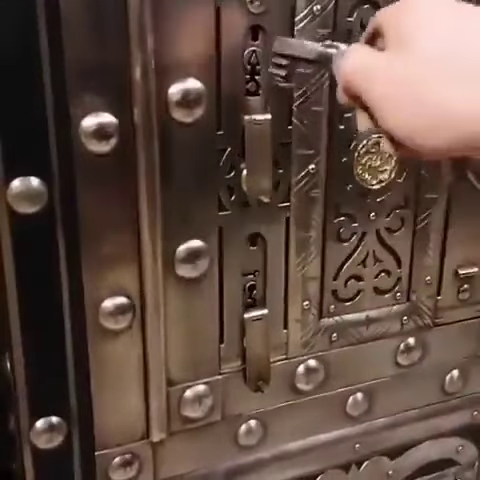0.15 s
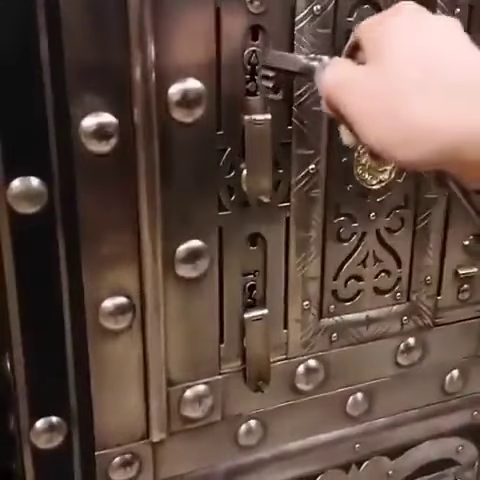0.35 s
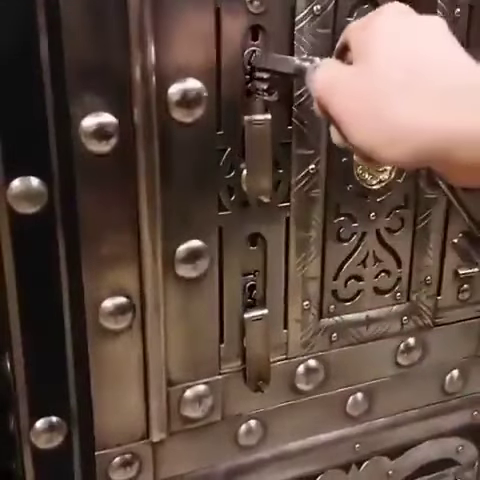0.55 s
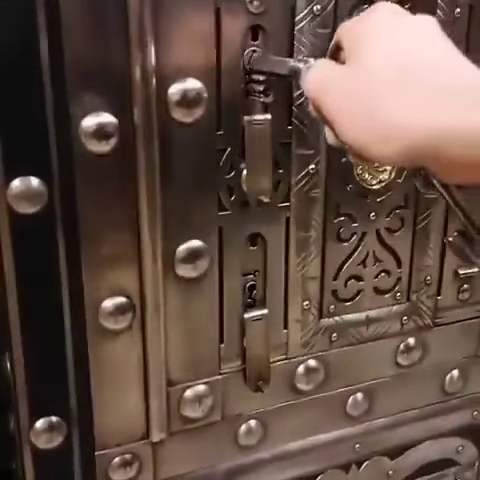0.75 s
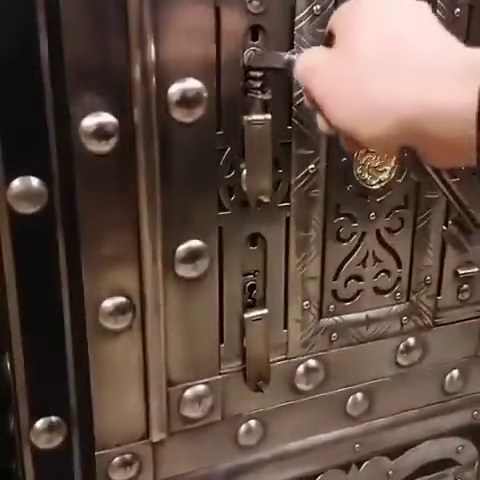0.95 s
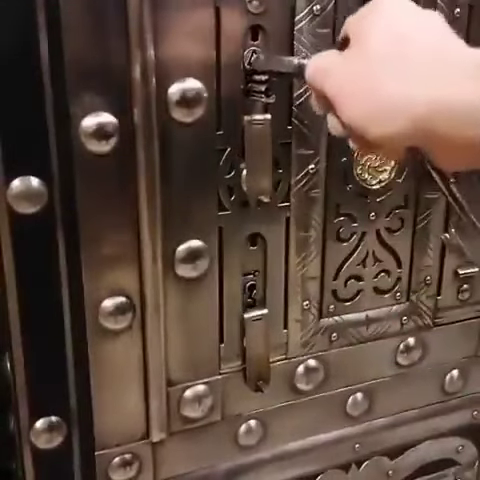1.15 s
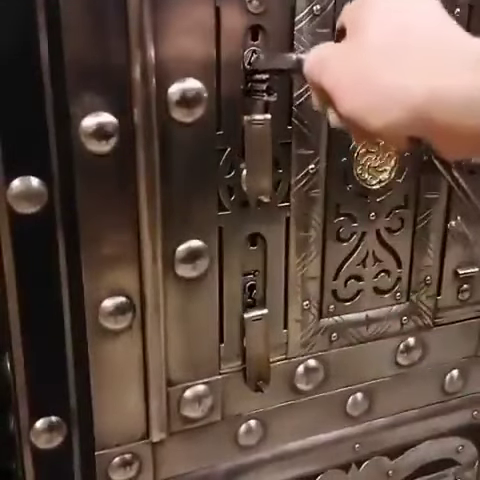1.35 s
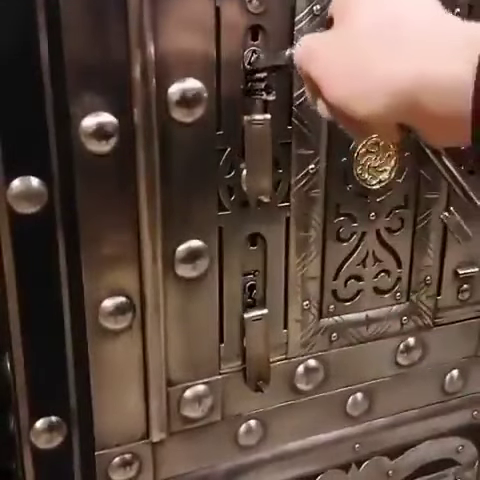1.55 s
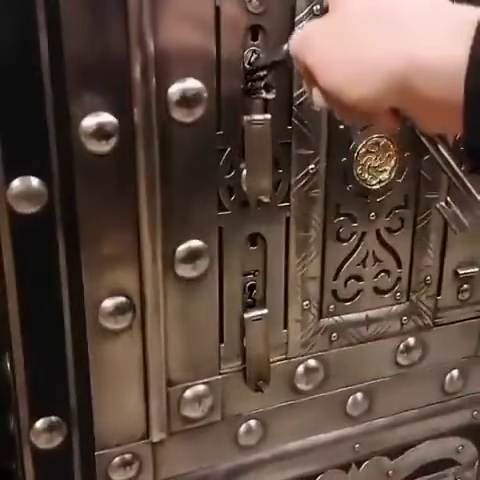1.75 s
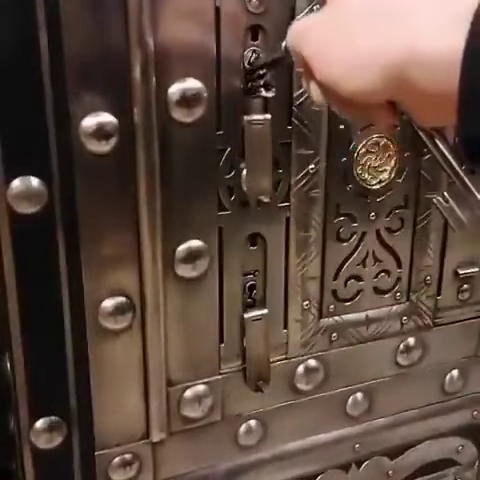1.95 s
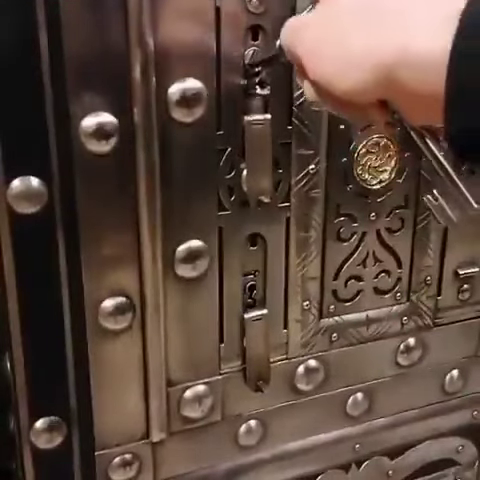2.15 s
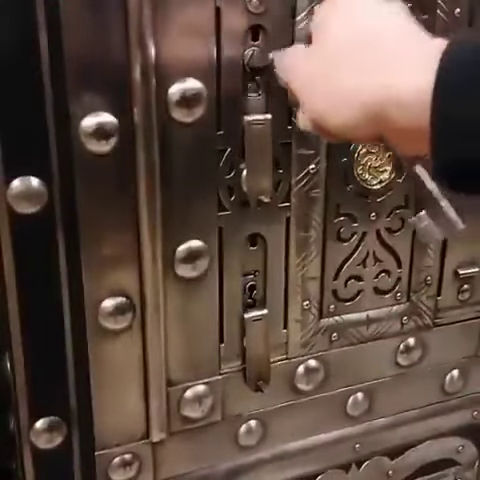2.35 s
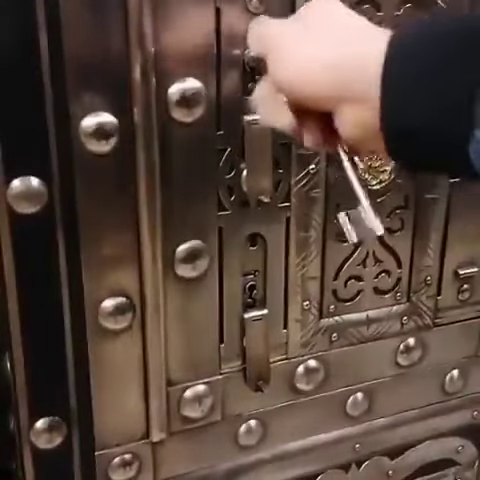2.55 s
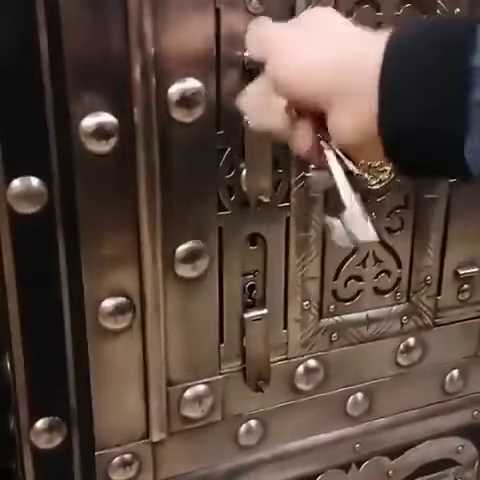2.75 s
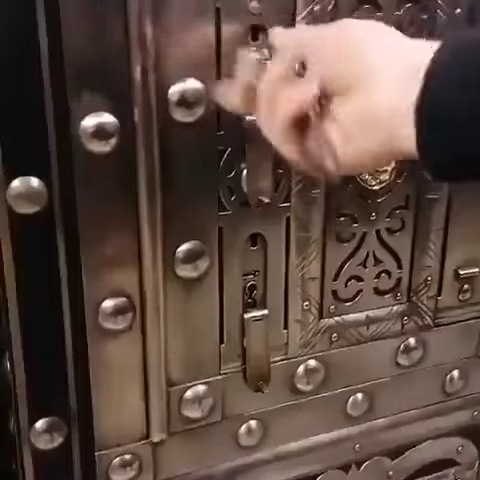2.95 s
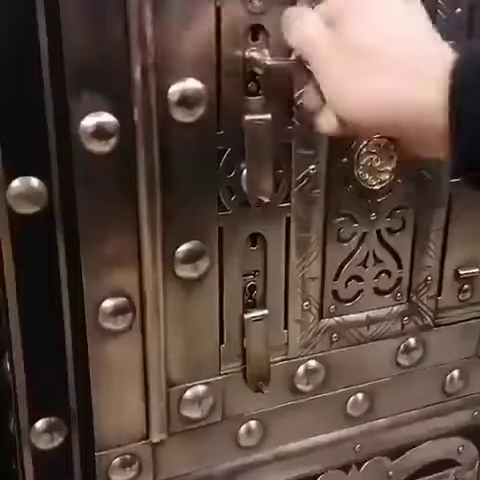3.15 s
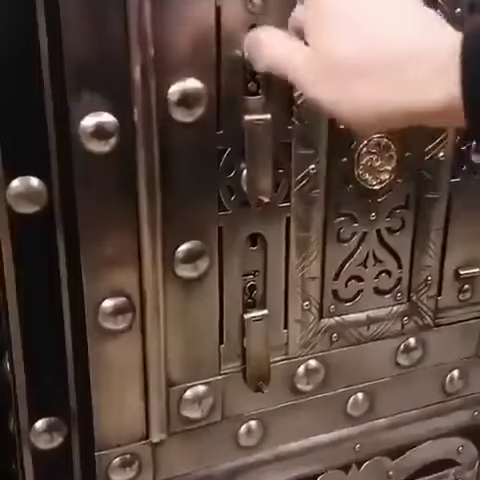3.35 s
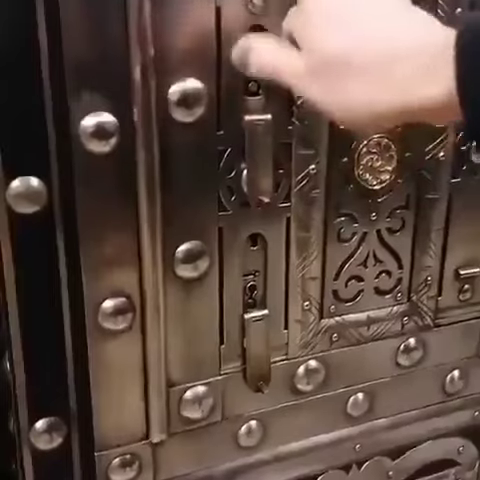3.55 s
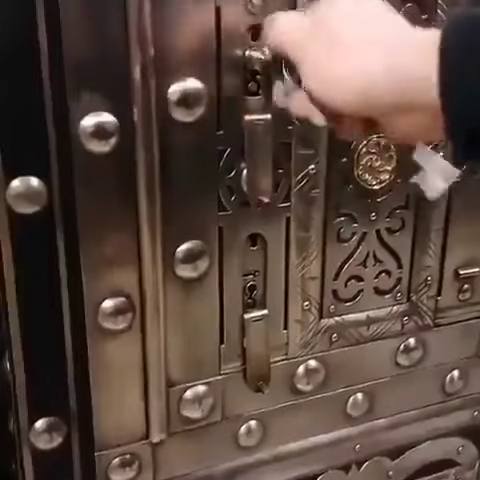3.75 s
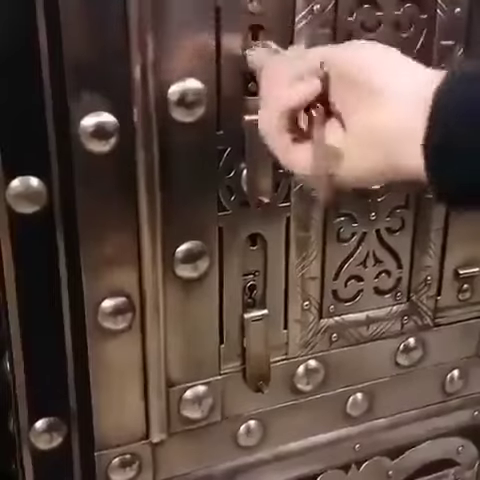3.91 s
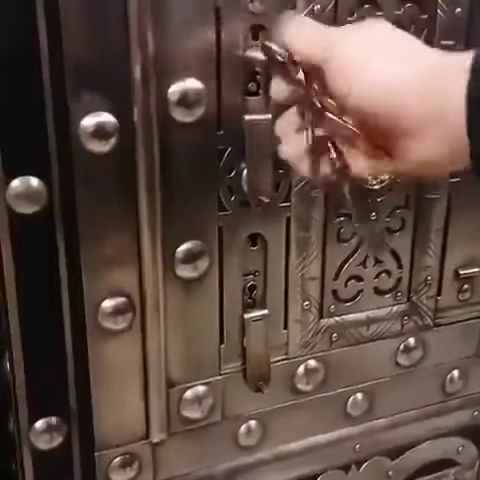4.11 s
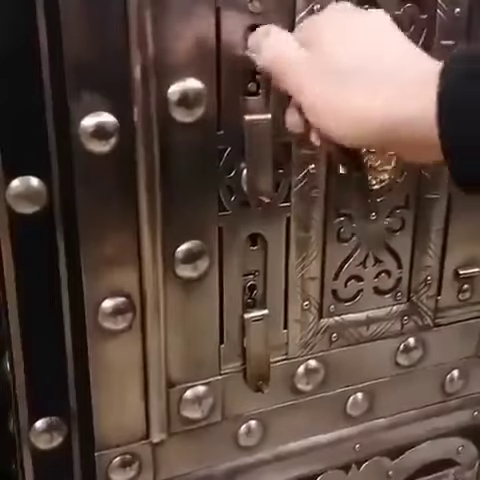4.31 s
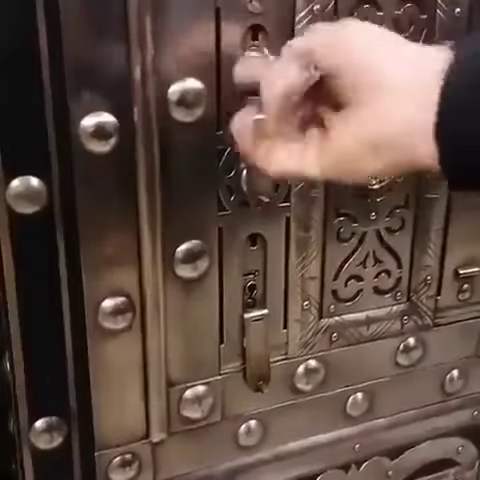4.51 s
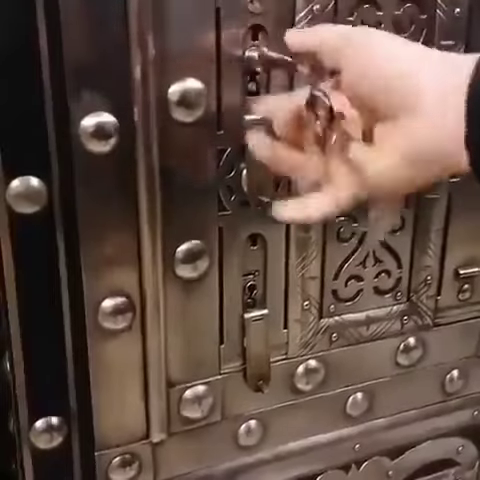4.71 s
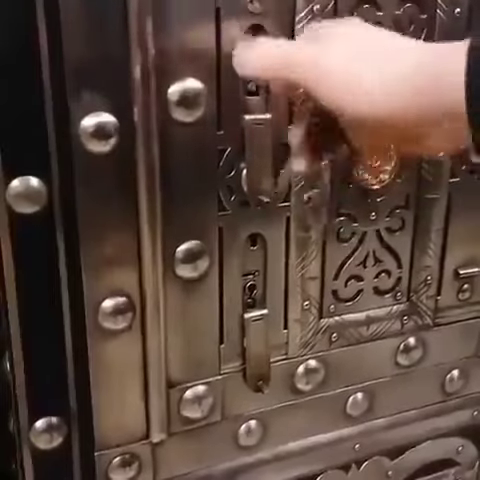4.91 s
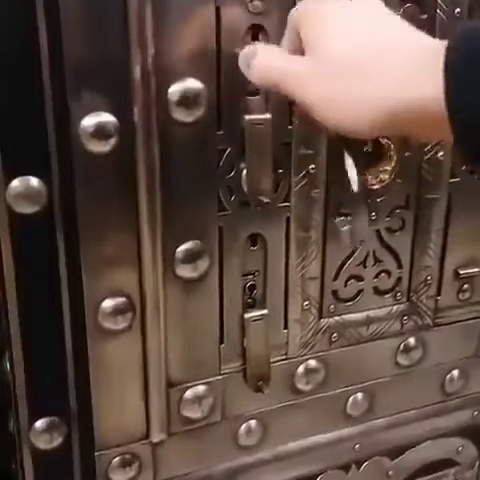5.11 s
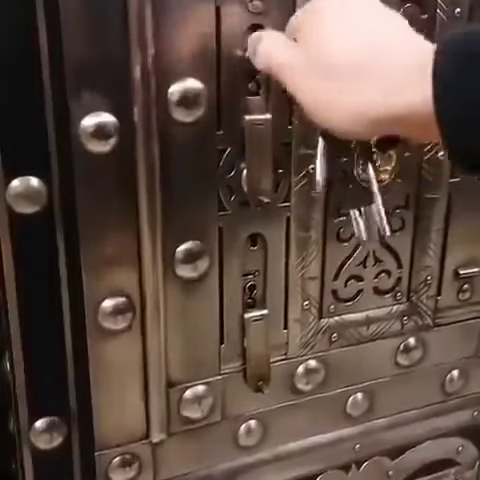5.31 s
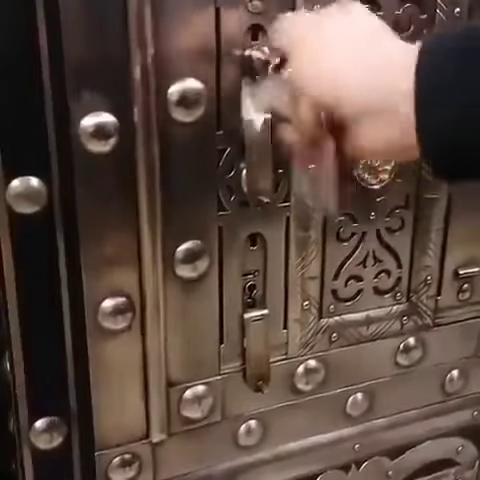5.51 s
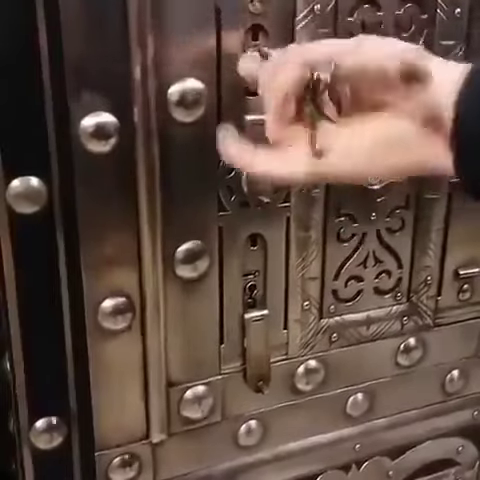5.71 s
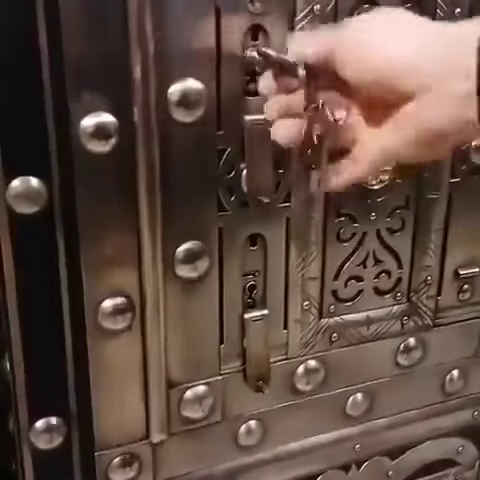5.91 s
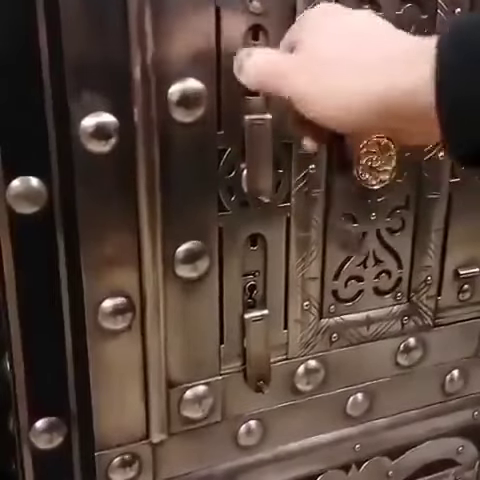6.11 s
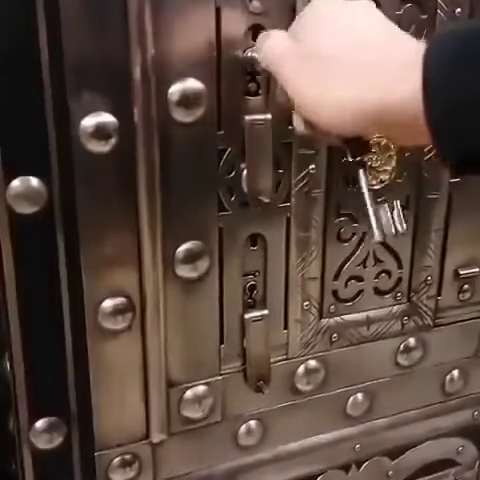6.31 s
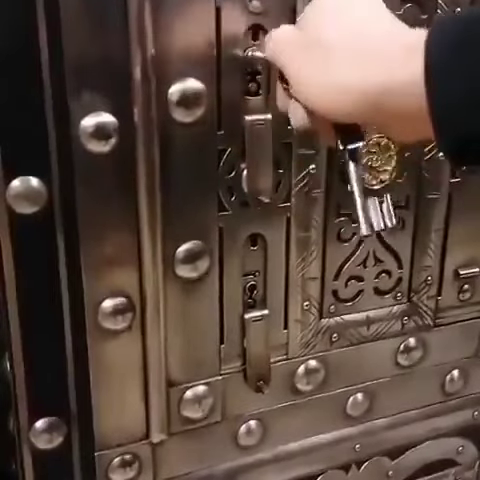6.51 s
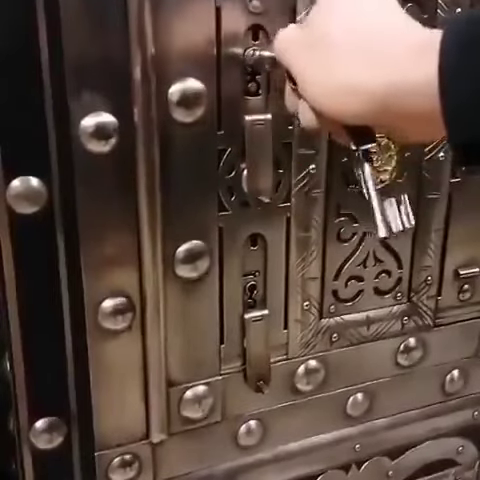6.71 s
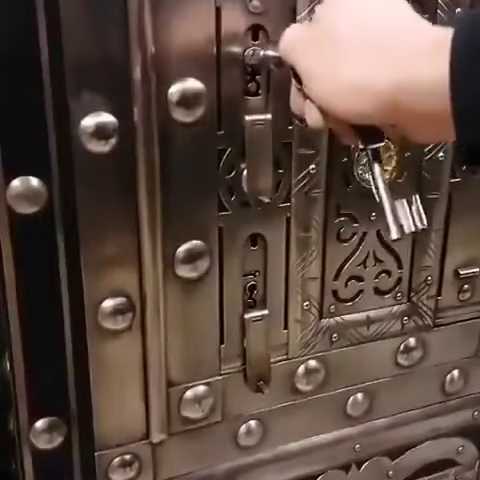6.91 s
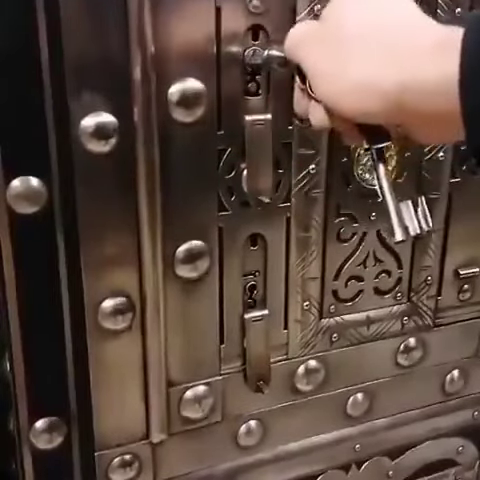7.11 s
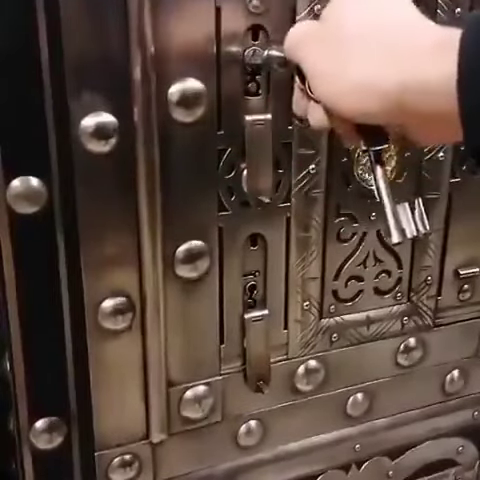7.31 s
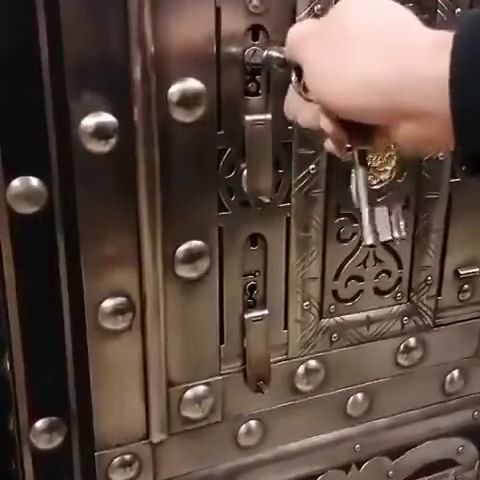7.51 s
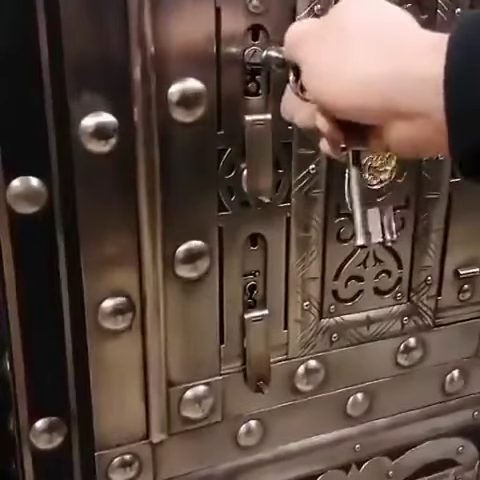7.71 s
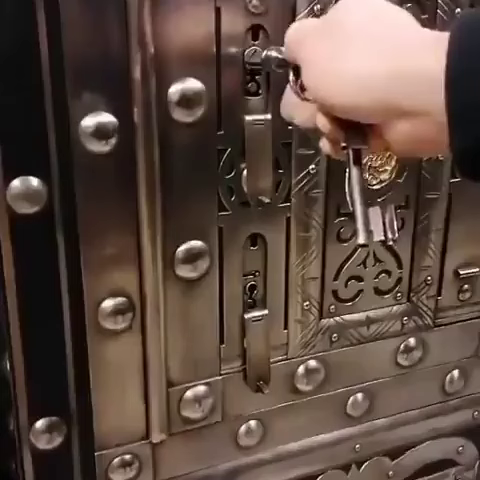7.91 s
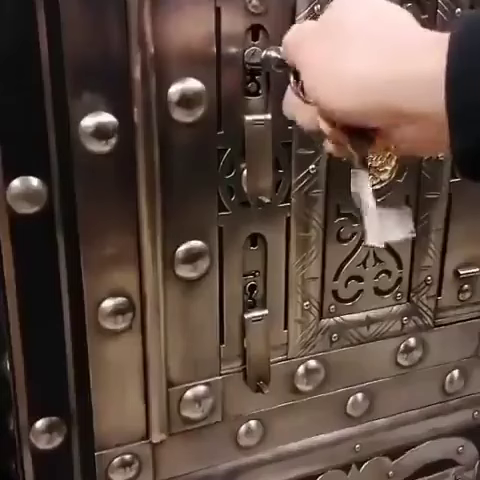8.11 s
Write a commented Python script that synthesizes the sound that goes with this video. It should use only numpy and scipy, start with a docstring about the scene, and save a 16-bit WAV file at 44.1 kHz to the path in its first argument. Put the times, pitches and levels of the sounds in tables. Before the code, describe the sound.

Heavy old lock heard from very near, with short room reflections and low steady room noise. Quiet key scrape and light plate taps first, then clusters of hard dull clacks with bright metal edges, low door thuds and gritty turning. The key bunch jingles between grips. The bolt breaks loose and slams three times, at about four, six and eight seconds, bouncing and shuddering in the iron door.

```python
"""Old key in a vault lock

A large key is pushed into the lock of an iron-clad door and turned, heard close by.
Knocks, slams and rebounds: chattering noise bursts through clack and edge colours, modal rings and a door thud.
Grinding, dragging and rattling: random grains through filters; the bolt also squeaks, a wavering tone with octave.
Spare keys on the ring clink and jingle through short modes; a small room and low steady noise surround it."""
import sys
import numpy as np
from scipy import signal
from scipy.fft import rfft, irfft
from scipy.io import wavfile
from scipy.ndimage import uniform_filter1d

SR = 44100
rng = np.random.default_rng(int(sys.argv[2]) if len(sys.argv) > 2 else 0)


def transcribe(u):
    """Save the signal u as a 16-bit wav file named by the first command-line argument.

    u: samples, shape (n,) or (channels, n), limited to [-1, 1]; the rate is SR.
    q: integer samples, one column per channel.
    """
    v = np.clip(np.atleast_2d(u).T, -1, 1)
    q = np.round(v * 32767).astype(np.int16)
    wavfile.write(sys.argv[1], SR, q)


N = 359856
TIME = np.arange(N) / SR

# Levels are relative: the functions add their own gains. Chatter and scrape times set burst envelopes.
# key on keyhole plate, wards, levers: [t/s, level/dB, clack f/Hz before plate shift, treble re level/dB, chatter/ms]
KNOCKS = [(0.603, -52, 696, -10, 26), (1.069, -39.5, 790, -8, 3.4), (1.109, -45.5, 720, -21, 8.6),
          (1.247, -35.5, 890, -12, 7.1), (1.538, -31.5, 796, -7, 4.3), (1.782, -42.5, 623, -17, 12.3),
          (2.422, -45.5, 790, -22, 6.8), (2.504, -38.5, 810, -7, 7.8), (2.512, -33.5, 910, 1, 3.1),
          (2.598, -33, 700, -14, 6.9), (2.618, -41.5, 796, -14, 6.5), (2.665, -36, 770, -9, 8.2),
          (2.765, -34, 950, -8.5, 14.4), (2.814, -30.5, 940, -5, 4.7), (2.862, -44, 900, -4, 8.6),
          (2.915, -43.5, 850, -7, 10), (2.946, -37.5, 870, -4.5, 9.1), (2.975, -34.5, 790, -10.5, 11),
          (3.0, -44, 848, -8.5, 5.3), (3.137, -34.5, 695, -14.5, 10), (3.164, -30, 800, -10.5, 5.4),
          (3.258, -44, 950, -15, 10), (3.309, -41.5, 1015, -20, 5), (3.385, -40.5, 745, -20, 6.3),
          (3.853, -51.5, 800, -12.5, 11.5), (4.0712, -34, 1245, -14, 4), (4.123, -38.5, 729, -4, 16),
          (4.171, -26.5, 670, -3.5, 6.5), (4.548, -38, 795, -15, 5), (4.798, -35.5, 810, -9.5, 5.7),
          (4.951, -42, 625, -23, 5.8), (5.35, -42.5, 926, -2.5, 11), (5.693, -36, 1116, -14, 4.3),
          (5.925, -32, 1220, -12, 3.7), (5.97, -31, 1002, -14, 7.8), (6.389, -35.5, 750, -6.5, 4.4),
          (6.701, -48.5, 1030, -7, 7.8), (6.821, -45.5, 840, -13, 6.1), (7.034, -51.5, 735, -12, 21),
          (7.543, -43, 740, -12, 15), (7.942, -34.5, 1240, -7, 7.6)]
# bolt slams home: [t/s, level/dB, clack f/Hz, chatter/ms, door thud re level/dB]
THROWS = [(4.237, -17.5, 860, 4.3, -6), (5.9904, -19.5, 1130, 4, -3), (7.9628, -19, 900, 3, -13.5)]
# bolt rebounds on its stop: [t/s, level/dB, door thud re level/dB]
REBOUNDS = [(4.2485, -26.5, -4.5), (4.259, -31, -9), (4.2742, -34, -13), (4.29, -36, -6), (6.0, -30, -9.5),
            (6.038, -35, -8), (7.971, -33, -12)]
# bolt breaks loose and drags across: [t/s, length/s, dragging/dB, opening rasp/dB]
DRAGS = [(4.151, 0.075, -39.5, -4), (5.907, 0.11, -43, -12.5), (7.931, 0.028, -47.5, -25)]
# hand twists and pushes the key: [t/s, length/s, grinding/dB, door rumble/dB]
TWISTS = [(0.612, 0.078, -73.5, -59.5), (2.49, 0.17, -56, -50), (2.75, 0.32, -65.5, -50.5),
          (3.134, 0.3, -62, -53), (3.42, 0.23, -58, -62), (3.667, 0.74, -74, -66), (4.55, 0.3, -65, -68),
          (4.753, 0.4, -63, -62.5), (5.104, 0.43, -62.5, -61), (5.351, 0.022, -65.5, -50.5),
          (5.628, 0.082, -56, -53.5), (6.248, 0.56, -66.5, -67), (6.835, 0.57, -88, -70.5),
          (7.535, 0.086, -72, -59.5)]
# bolt squeak, one row: [t/s, length/s, f/Hz, level/dB]
SQUEAK = (4.131, .026, 3165, -27.5)
# keys of the bunch strike each other: [t/s, level/dB, scrape/ms]
CLINKS = [(3.042, -44.5, 2.4), (3.089, -52.5, 2.5), (3.322, -42.5, 2), (3.385, -41.5, 1.2),
          (3.436, -37.5, 5.1), (3.446, -29.5, 4.3), (3.531, -35.5, 9.8), (3.582, -32, 3.5),
          (3.603, -42, 5.7), (3.651, -43, 7.9), (4.39, -47, 4.8), (4.421, -39.5, 8.3), (4.459, -39, 6.8),
          (4.576, -40, 6.6), (4.611, -38.5, 7.2), (4.634, -37.5, 6.7), (4.656, -39, 19), (5.01, -35, 15),
          (5.077, -34.5, 5.2), (5.132, -43, 7), (5.187, -41, 5.5), (5.324, -40.5, 5.9), (5.358, -39.5, 4.4),
          (5.405, -36, 5), (5.432, -39.5, 9.3), (5.469, -34, 9), (5.606, -42, 6.9), (6.177, -44.5, 3.4),
          (6.229, -48, 3), (6.397, -33.5, 12.6), (6.63, -47.5, 3.1), (6.767, -53.5, 2.8)]
# bunch swings as the hand turns or takes a new grip: [t/s, length/s, jingle/dB]
SWINGS = [(2.808, 0.5, -71.5), (3.31, 0.28, -59.5), (4.359, 0.11, -54.5), (4.546, 0.17, -52.5),
          (4.777, 0.12, -67.5), (4.948, 0.19, -64), (5.11, 0.37, -53.5), (5.507, 0.18, -61),
          (6.162, 0.47, -59)]
# keys' strongest tones: [f/Hz]
KEY_TONES_HZ = [6324, 7490, 7690, 11886]
# range of ward and lever tones: [low f/Hz, high f/Hz]
WARD_TONES_HZ = (1300, 8000)

# modes of lock case, keyhole plate, door: [f/Hz, level/dB before 1/sqrt(t60) weighting, t60/s]
CASE_MODES = [(402.6, -12, 0.52), (578, -6, 0.15), (838, 1, 0.06), (1162, -2.5, 0.036), (1407, -11, 0.054),
              (2420, -7, .025)]
PLATE_MODES = [(248.7, 3.5, 0.54), (399, -2.5, 0.6), (4280, -4, 0.2), (4320, -8, 0.19), (4650, -10, .18),
               (4800, -12, 0.14)]
DOOR_MODES = [(54, -10, 0.31), (68, -9, 0.51), (88, -9, 0.36), (143, -10.5, .22), (194.4, 1.5, 0.17),
              (254.2, 2.5, 0.49)]

# spectral colours of the contacts, loose boltwork (RATTLE) and room noise (AIR): [f/Hz, relative level/dB]
CLACK = [(150, -25.5), (350, -9), (550, -3.5), (820, 0), (1300, -9), (2000, -12.5), (3000, -18.5),
         (5000, -29.5), (12000, -58.5)]
EDGE = [(600, -15.5), (1500, -1.5), (2600, 7.5), (4000, 2.5), (6300, 7), (9000, -0.5), (10600, -6),
        (12000, -37), (14000, -40)]
THUD = [(26, -21.5), (55, 6.5), (100, -3), (150, -5.5), (210, 5), (320, -3), (500, -16.5), (1200, -54.5)]
GRIND = [(120, -14), (300, -3), (750, 8.5), (1200, -7.5), (2200, -4), (4000, -13.5), (8000, -17.5),
         (11000, -30.5), (14000, -43.5)]
RATTLE = [(150, -10), (400, -4), (800, 1.5), (1500, -4), (3000, -9.5), (6000, -10.5), (10000, -25),
          (12500, -48)]
TINKLE = [(400, -9.5), (2000, -5.5), (4000, -7.5), (6300, -2.5), (7600, 0.5), (10500, 2), (12300, -13),
          (13450, -18.5), (13900, -28.5)]
SLIDE = [(200, 0), (1000, -8.5), (3000, -3.5), (7000, 0.5), (10000, -1.5), (13000, -19), (14500, -30)]
AIR = [(32, -9.5), (65, -0.5), (115, -14), (153, -18), (484, -21.5), (1660, -28), (14200, -41.5)]
# room decay: [f/Hz, t60/s]
ROOM_DECAY = [(80, 0.31), (250, 0.82), (800, 0.39), (2500, 0.53), (6000, 0.34), (12000, 0.39)]

SEATED_S = 1.7  # key fully home from here on
TURNING_S = 2.55  # from here on the key presses on the plate and stops its ring

# a slow, soft push moves the door more than a quick, hard tap
TYPICAL_DB, TYPICAL_MS = -38, 8
THUD_DB, THUD_DB_PER_DOUBLING, THUD_DB_PER_DB = -4, 4.5, -0.1
# a part rubs before it strikes; rub level re blow
LEAD_S, RUB_DB, RUB_DB_PER_DOUBLING = 0.011, -12, 9.5

SLAM_TREBLE_DB, SHUDDER_DB, SHUDDER_FALL_S = -4, -24, 0.093
TWIST_RISE_S, TWIST_FALL_S = 0.017, 0.04
SWING_RISE_S, SWING_FALL_S = 0.03, 0.0068
CONTACT_S = .025  # spacing of the key-pair pressure knots
SLIDE_DB, SLIDE_RISE_S, SLIDE_FADE_DB_PER_S = -64, 0.046, 29
AIR_DB = -70
PATH_CHANGE_S = .4
BAND_EDGE_HZ = 14300


def knocks(plate_focus=1.5, plate_shift=1.135, plate_thud_db=-3, door_db=-5, plate_ring_db=2,
           ring_db_per_db=1.62):
    """The key strikes plate, wards and levers: contact bursts, with a plate ring that grows with the blow."""
    out = np.zeros(N)
    # the plate's voice is higher and narrower
    plate_voice = np.multiply(CLACK, [plate_shift, plate_focus])
    for s, db, pitch_hz, treble_db, chatter_ms in KNOCKS:
        voice, bass_db = CLACK, THUD_DB
        if s < SEATED_S:
            voice, bass_db = plate_voice, THUD_DB + plate_thud_db
        bass_db += THUD_DB_PER_DOUBLING * np.log2(chatter_ms / TYPICAL_MS)
        bass_db += THUD_DB_PER_DB * (db - TYPICAL_DB)
        add(out, s - LEAD_S, blow(db, pitch_hz, treble_db, bass_db, chatter_ms, voice, door_db))
        if s < TURNING_S:
            ring_db = db + plate_ring_db + ring_db_per_db * (db - TYPICAL_DB)
            add(out, s, amp(ring_db) * ring(PLATE_MODES, spread_db=5.0))
    return out


def bolt(drag_push_db=-4, rattle_db=-36, slam_door_db=-2, rebound_ms=2.2, rebound_hz=780,
         rebound_treble_db=-10, rebound_door_db=4):
    """The bolt rasps loose, drags, slams and rebounds; door and loose boltwork shudder on as dying grains."""
    out, drag, push, rattle = np.zeros((4, N))
    for s, length, db, rasp_db in DRAGS:
        rasp = unit(through(burst(6.8, 8.2), colour(EDGE, ripple_db=5.5)))
        add(out, s, amp(rasp_db) * rasp)
        travel = amp(db) * gesture(s, length, rise_s=0.015, fall_s=0.024)
        drag += travel
        push += amp(drag_push_db) * travel
    for s, db, pitch_hz, chatter_ms, bass_db in THROWS:
        slam = blow(db, pitch_hz, SLAM_TREBLE_DB, bass_db, chatter_ms, CLACK, slam_door_db)
        add(out, s - LEAD_S, slam)
        shudder = amp(db) * gesture(s, 0, rise_s=0.011, fall_s=SHUDDER_FALL_S)
        rattle += amp(rattle_db) * shudder
        push += amp(bass_db + SHUDDER_DB) * shudder
    for s, db, bass_db in REBOUNDS:
        rebound = blow(db, rebound_hz, rebound_treble_db, bass_db, rebound_ms, CLACK, rebound_door_db)
        add(out, s - LEAD_S, rebound)
    out += through(grains(per_s=580, spread_db=3.0) * drag, colour(GRIND, shift=0.88, ripple_db=2.0))
    out += through(grains(per_s=290, spread_db=3.5) * rattle, colour(RATTLE))
    return out + rumble(push)


def blow(db, pitch_hz, treble_db, bass_db, chatter_ms, voice, door_db, clack_db=20.5, edge_db=22,
         thud_db=20, case_db=-10, thud_lag_s=.005, middle_hz=820, ward_db=-4):
    """One blow: a rub, then clack, bright edge and case ring; the heavy door answers a little later."""
    out = np.zeros(SR // 2)
    clack = colour(voice, pitch_hz / middle_hz, ripple_db=2.6)
    edge = colour(EDGE, ripple_db=1.8)
    edge = unit(unit(through(edge, ward_ring())) * amp(ward_db) + edge)

    # longer chatter, louder rub, up to half an octave above typical
    rub_db = RUB_DB + RUB_DB_PER_DOUBLING * min(np.log2(chatter_ms / TYPICAL_MS), .5)
    rub = unit(through(burst(30, 3.8), clack + amp(treble_db) * edge))
    add(out, 0, amp(clack_db + rub_db) * rub)

    clack_hit = unit(through(burst(0.27 * chatter_ms, chatter_ms), clack))
    edge_hit = unit(through(burst(0.37 * chatter_ms, chatter_ms), edge))
    case_hit = unit(through(burst(1.0, .5 * chatter_ms), ring(CASE_MODES, spread_db=-1.0)))
    hit = amp(clack_db) * clack_hit
    hit += amp(edge_db + treble_db) * edge_hit
    hit += amp(clack_db + case_db) * case_hit
    add(out, LEAD_S, hit)

    boom = unit(through(burst(2.9, 24), colour(THUD)))
    boom += amp(door_db) * unit(through(burst(3.2, 5.1), ring(DOOR_MODES, spread_db=2.0)))
    add(out, LEAD_S + thud_lag_s, amp(bass_db + thud_db) * boom)
    return amp(db) * out


def ward_ring(t60=0.014, count=9):
    """The few short, high modes of whichever ward or lever is struck."""
    low, high = WARD_TONES_HZ
    place = (np.arange(count) + rng.random(count)) / count
    hz = low * (high / low) ** place
    return ring(np.column_stack([hz, read(EDGE, hz), np.full(count, t60)]), spread_db=4, size=4096)


def grinding(count=12):
    """The bit sticks and slips on the wards: sparse grains in several voices; the push shakes the door."""
    force, push, scrape = np.zeros((3, N))
    for s, length, grind_db, rumble_db in TWISTS:
        effort = gesture(s, length, TWIST_RISE_S, TWIST_FALL_S)
        force += amp(grind_db) * effort / np.sqrt(count)
        push += amp(rumble_db) * effort
    for _ in range(count):
        slip = unit(through(burst(0.53, 5.6), colour(GRIND, ripple_db=4.0)))
        scrape += through(grains(per_s=8, spread_db=3.0) * force, slip)
    return scrape + rumble(push)


def rumble(push, door_db=-8):
    """Uneven shoves excite the door's thud and modes."""
    shoves = grains(per_s=90, spread_db=1.5) * push
    thud = through(shoves, colour(THUD))
    return thud + amp(door_db) * through(shoves, ring(DOOR_MODES, spread_db=3.5))


def squeak(octave_db=-2, waver=.004):
    """The bolt's stick-slip tone and octave, with random pitch waver."""
    s, length, hz, db = SQUEAK
    count = int(length * SR)
    drift = uniform_filter1d(rng.standard_normal(N), size=100)[:count] * np.sqrt(100)
    phase = 2 * np.pi * np.cumsum(hz * (1 + waver * drift)) / SR
    tone = np.sin(phase) + amp(octave_db) * np.sin(2 * phase)
    out = np.zeros(N)
    add(out, s, amp(db) * np.hanning(count) ** 2 * tone)
    return out


def bunch(clink_db=21.0, tick_db=-9, rise_share=0.32, count=16):
    """Keys scrape and ring, choked by the hand; as the bunch swings, pairs chatter under random pressure."""
    out = np.zeros(N)

    def touch(scrape_ms):
        """One rough contact, its short ring and its tick."""
        contact = burst(rise_share * scrape_ms, scrape_ms)
        ringing = unit(through(contact, key_ring()))
        tick = unit(through(contact, colour(TINKLE, ripple_db=4.5)))
        return ringing + amp(tick_db) * tick

    for s, db, scrape_ms in CLINKS:
        add(out, s, amp(db + clink_db) * touch(scrape_ms))
    swing = np.zeros(N)
    for s, length, db in SWINGS:
        swing += amp(db) * gesture(s, length, SWING_RISE_S, SWING_FALL_S) / np.sqrt(count)
    moments = np.arange(0, N / SR + CONTACT_S, CONTACT_S)
    for _ in range(count):
        # the high power leaves brief, scattered contacts
        pressure = np.interp(TIME, moments, rng.random(len(moments)) ** 12)
        pressure = unit(pressure) * np.sqrt(N)
        chatter = grains(per_s=200, spread_db=2.0) * pressure * swing
        out += through(chatter, touch(scrape_ms=1.2))
    return out


def key_ring(tones_db=2, t60=0.026, spread=.35, count=13):
    """The keys' own modes plus a crowd that varies with the touching point and the damping hand."""
    crowd = 3800 + 9900 * (np.arange(count) + rng.random(count)) / count
    hz = np.append(crowd, KEY_TONES_HZ)
    damping = t60 * np.exp(spread * rng.standard_normal(len(hz)))
    is_own_tone = np.arange(len(hz)) >= count
    db = read(TINKLE, hz) + tones_db * is_own_tone
    return ring(np.column_stack([hz, db, damping]), spread_db=7, size=8192)


def sliding():
    """The key rubs up to the keyhole, slowing: fine grains that rise at once and fade."""
    speed = np.minimum(TIME / SLIDE_RISE_S, 1) * amp(SLIDE_DB - SLIDE_FADE_DB_PER_S * TIME)
    return through(grains(per_s=4600, spread_db=2.0) * speed, colour(SLIDE))


def room(x, early_db=-8, tail_db=-8, delay_s=0.0036, count=4):
    """Early reflections and a tail with frequency-dependent decay; several responses crossfade in rotation."""
    out = np.zeros(N)
    for k in range(count):
        hz, t, z = signal.stft(rng.standard_normal(SR), SR, nperseg=256)
        decay = np.exp(-np.log(1000) * t / read(ROOM_DECAY, hz)[:, None])
        tail = signal.istft(z * decay, SR, nperseg=256)[1][:SR]
        onset = 1 - np.exp(-TIME[:SR] / 0.00079)
        response = np.zeros(SR)
        add(response, delay_s, amp(early_db) * burst(4.5, 10.5))
        add(response, delay_s, amp(tail_db) * unit(tail * onset))
        turn = (TIME / PATH_CHANGE_S + k) % count
        share = np.sin(np.pi * np.minimum(turn / 2, 1))
        out += through(x * share, response)
    return out


def air():
    """Low steady room noise: filtered white noise."""
    return amp(AIR_DB) * through(rng.standard_normal(N), colour(AIR))


def gesture(start, length, rise_s, fall_s):
    """Gain of one movement: linear rise, hold to its length, exponential fall."""
    t = TIME - start
    return np.clip(t / rise_s, 0, 1) * np.exp(-np.clip((t - length) / fall_s, 0, 20))


def burst(rise_ms, fall_ms, size=16384):
    """Metal chatter: a dense, quickly dying noise run with an evened spectrum, energy 1."""
    ms = TIME[:size] * 1000
    shape = (1 - np.exp(-ms / rise_ms)) ** 2 * np.exp(-ms / max(fall_ms, .5))
    z = rfft(rng.standard_normal(size) * shape)
    evened = irfft(z / (abs(z) + 1e-12) ** .6)
    return unit(evened * shape ** .2)


def grains(per_s, spread_db):
    """Random clicks of uneven size and sign, rms 1."""
    out, count = np.zeros(N), int(per_s * N / SR) + 1
    place, chance, sign = rng.random((count, 3)).T
    size_db = spread_db * np.minimum(-np.log(1 - chance), 3.5)
    out[(place * N).astype(int)] = amp(size_db) * np.sign(sign - .5)
    return unit(out) * np.sqrt(N)


def ring(modes, spread_db, size=16384):
    """Dying sines, energy 1; each strike point weights the modes differently."""
    hz, db, t60 = np.transpose(modes)[:, :, None]
    t = TIME[:size]
    weight, phase = rng.standard_normal((len(modes), 2)).T[:, :, None]
    decay = np.exp(-np.log(1000) * t / t60) / np.sqrt(t60)
    waves = np.sin(2 * np.pi * (hz * t + phase)) * decay
    return unit((amp(db + spread_db * weight) * waves).sum(0))


def colour(points, shift=1, ripple_db=0, size=4096):
    """Minimum-phase response of a given spectrum, energy 1; each contact point ripples it in its own way."""
    hz = abs(np.fft.fftfreq(size, 1 / SR))
    knots = np.geomspace(100, 20000, 70)
    ripple = np.interp(hz, knots, rng.standard_normal(len(knots)))
    db = read(points, hz / shift) + ripple_db * ripple
    spectrum = np.exp(np.conj(signal.hilbert(np.log(amp(db)))))
    return unit(np.fft.ifft(spectrum).real[:size // 2])


def through(x, response):
    """Passes a sound through an impulse response."""
    return signal.oaconvolve(x, response)[:len(x)]


def add(mix, s, sound):
    """Mixes a sound in at s seconds."""
    part = mix[max(round(s * SR), 0):][:len(sound)]
    part += sound[:len(part)]


def read(points, hz):
    """Interpolates a table along log frequency."""
    f, value = np.transpose(points)
    return np.interp(np.log(hz + 1), np.log(f + 1), value)


def unit(x):
    """Scales to energy 1."""
    return x / np.sqrt(np.sum(x ** 2) + 1e-20)


def amp(db):
    """Decibels to gain."""
    return 10 ** (np.asarray(db) / 20)


def scene():
    """Lock and keys in the room."""
    dry = knocks() + bolt() + grinding() + squeak() + bunch() + sliding()
    return (dry + room(dry) + air())[None]


def record(dry):
    """Band limit: linear-phase lowpass."""
    lowpass = signal.firwin(255, BAND_EDGE_HZ, window=("kaiser", 8), fs=SR)
    return signal.oaconvolve(dry, lowpass[None], "same")


dry = scene()
out = record(dry)
transcribe(out)
```